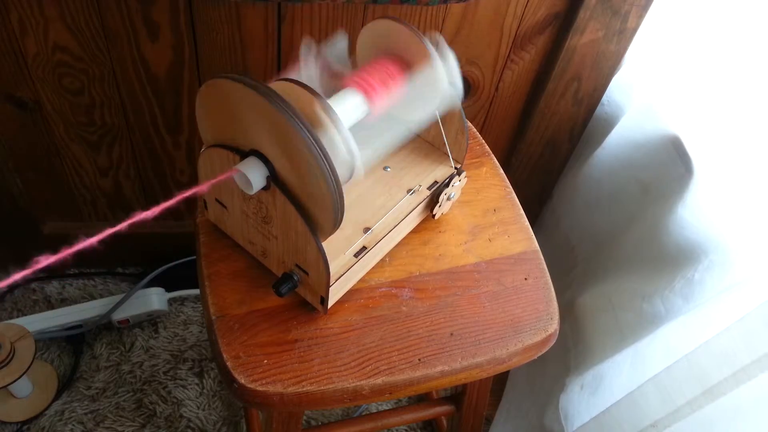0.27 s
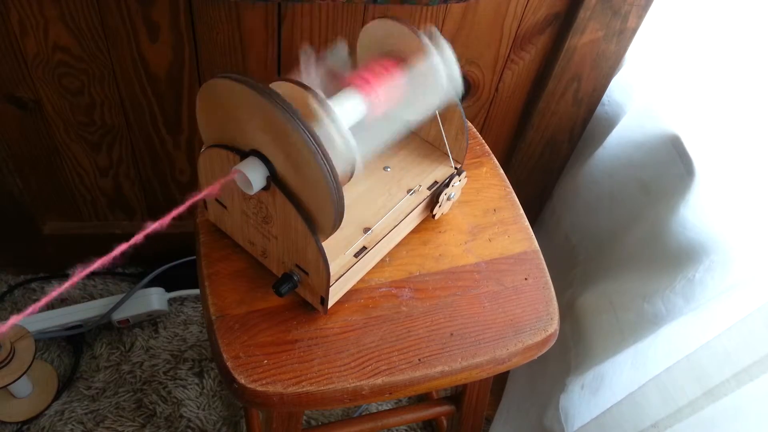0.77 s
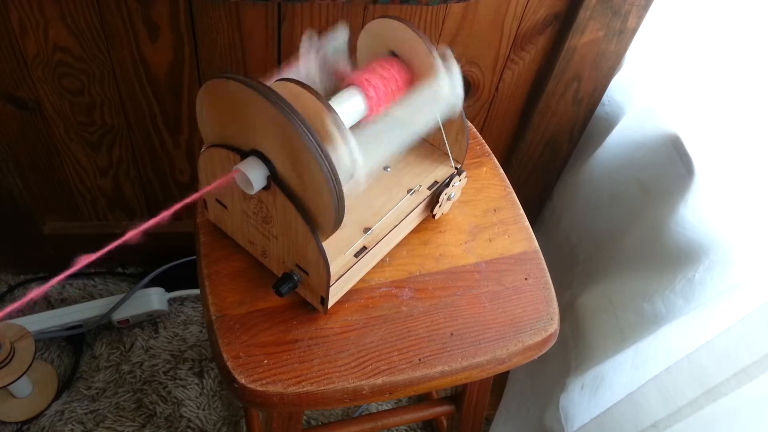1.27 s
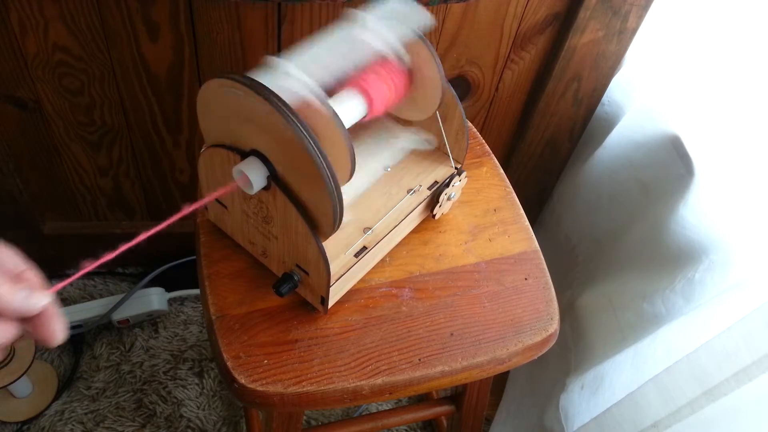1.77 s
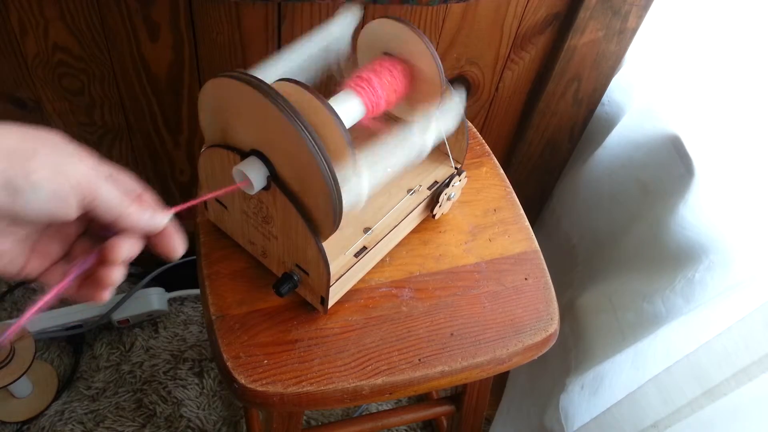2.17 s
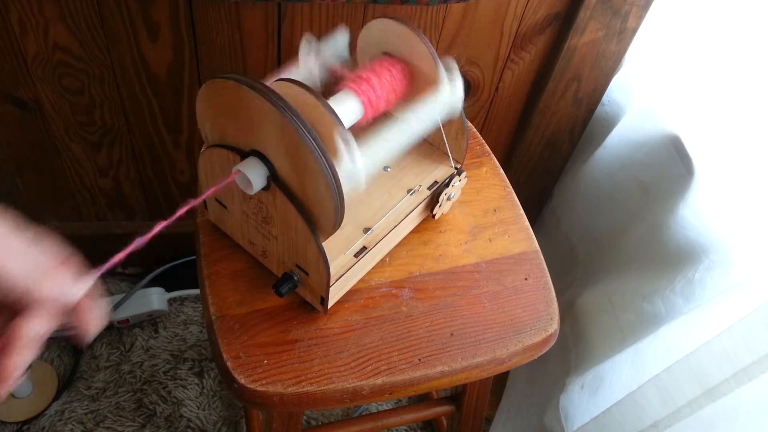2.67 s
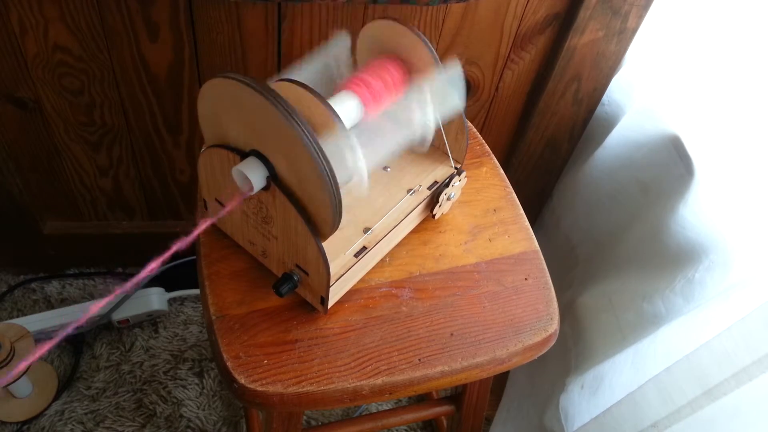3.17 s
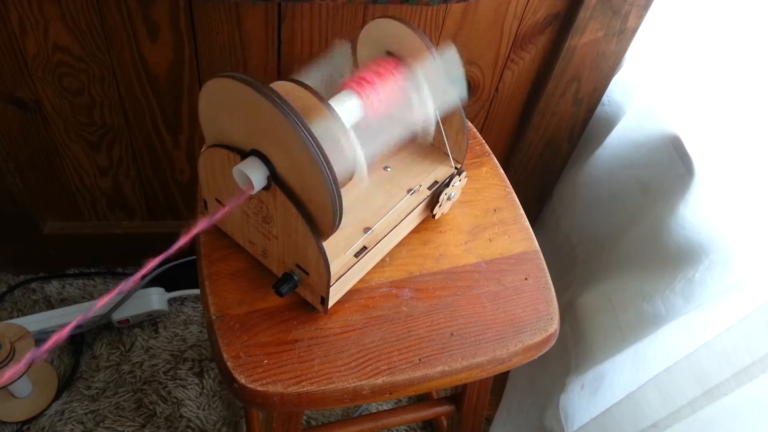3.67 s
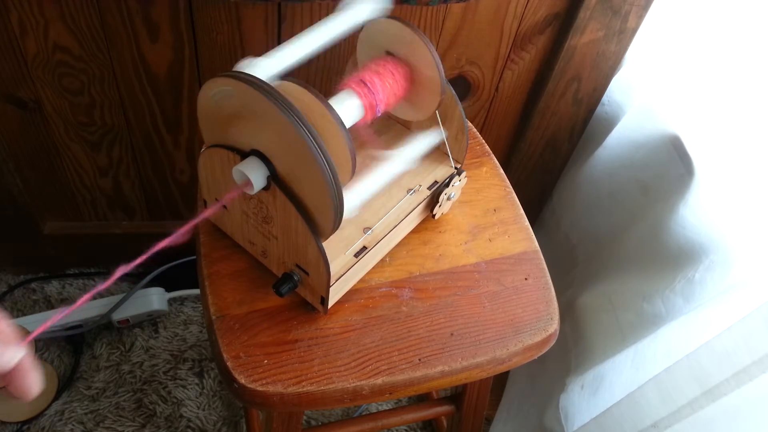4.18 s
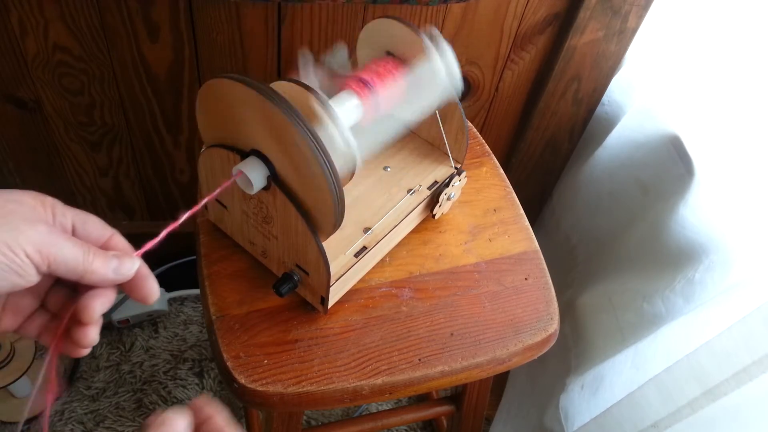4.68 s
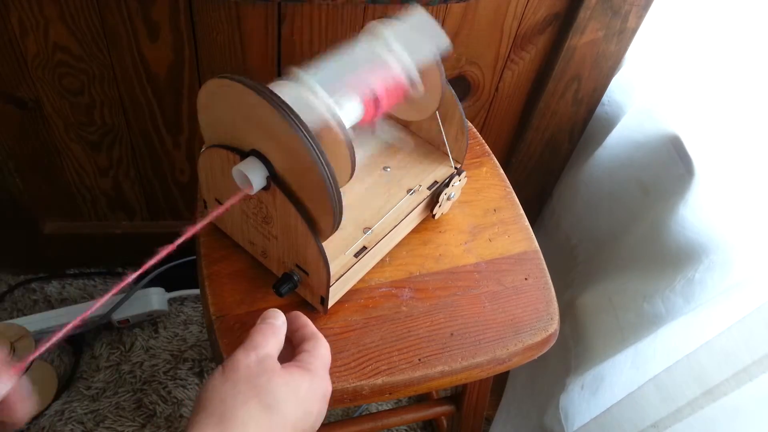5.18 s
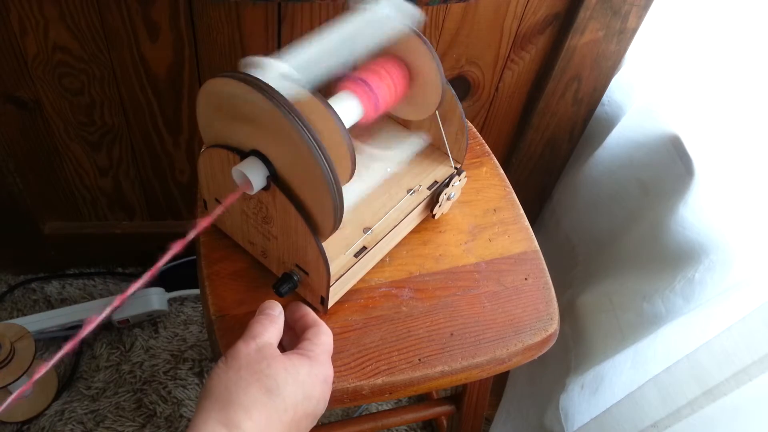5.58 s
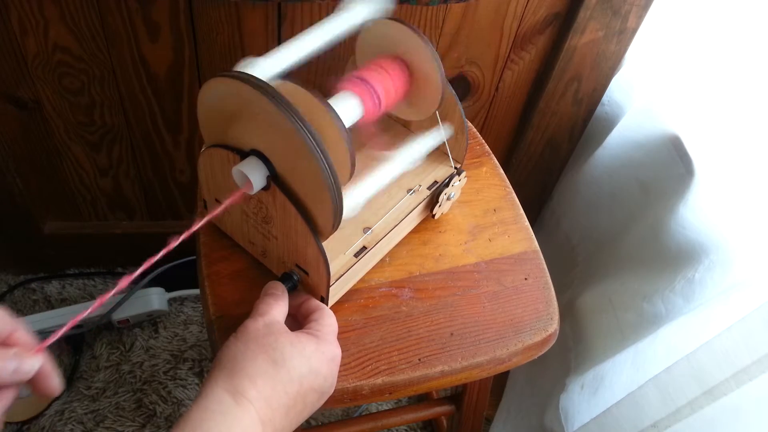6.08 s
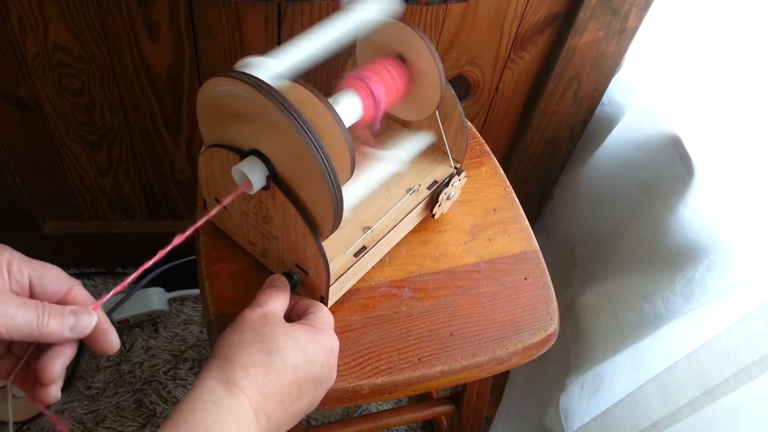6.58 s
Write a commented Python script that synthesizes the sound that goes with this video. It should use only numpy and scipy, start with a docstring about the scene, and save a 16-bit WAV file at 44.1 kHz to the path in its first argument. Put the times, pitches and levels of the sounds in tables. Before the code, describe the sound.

A small wooden electric spinning wheel whirs and rattles roughly in a quiet room, ticking and knocking irregularly, with brief squeaks, then stops abruptly.

```python
"""Quiet room, wooden stool: a small electric spinning wheel in a plywood box, a metre from a two-port
microphone. Bearings and bobbin rub in spells of light and hard contact: random stick-slip jerks through
resonances. The yarn guide ticks on many turns and the loose bobbin knocks the box: blows ring damped modes. The
drive squeaks as it slips, a gliding pulse train; the motor's fan hisses steadily. At the end the motor is
switched off and a rough hum sinks away."""
import sys
import numpy as np
from scipy import signal
from scipy.fft import rfft, irfft
from scipy.io import wavfile
from scipy.ndimage import uniform_filter1d

SR = 44100
rng = np.random.default_rng(int(sys.argv[2]) if len(sys.argv) > 2 else 0)


def voltage_ratio(level):
    """Linear amplitude factor for a level in decibels (scalar or array-like)."""
    return 10 ** (np.asarray(level, float) / 20)


def log_audio(samples):
    """Write samples as a 16-bit WAV file to the path given in sys.argv[1]."""
    # one column per channel
    frames = np.atleast_2d(samples).T
    # limit to full scale, then quantise
    limited = np.clip(frames, -1, 1)
    pcm = np.round(limited * 32767).astype(np.int16)
    wavfile.write(sys.argv[1], SR, pcm)


N = 302085
T = np.arange(N) / SR

# room air and microphone noise: pitch_hz, level_db_per_hz
ROOM_NOISE = [(28, -2), (45, -10), (69, -8), (144, -9), (183, -5), (215, -5.5), (240, -6), (1950, -20.5),
              (14300, -28), (15500, -54)]
# air from the motor's fan: pitch_hz, level_db_per_hz
FAN_AIR = [(5000, -13), (9000, -1), (12000, -2), (14400, -2), (15200, -35)]
# coasting motor: time_s, hum_hz, level_db
COASTING = [(6.68, 301.5, -58), (6.75, 148, -59), (6.82, 85, -62)]
# drive slips, one list per squeak: time_s, slip_rate_hz, level_db
DRIVE_SLIPS = [
    [(1.011, 1034, -40), (1.015, 986, -24), (1.021, 890, -22.5), (1.028, 780, -23.5), (1.036, 715, -22)],
    [(1.964, 950, -36), (1.973, 850, -27.5), (1.981, 750, -31)],
    [(5.768, 980, -31), (5.775, 853, -23.5), (5.782, 746, -27)],
    [(5.934, 738, -39), (5.951, 896, -30), (5.961, 1060, -34)],
    [(6.620, 1076, -39), (6.635, 1027, -25.5), (6.650, 884, -24.5), (6.660, 804, -26.5), (6.671, 714, -30)],
]
# resonances that colour the squeaks: pitch_hz, width_hz, level_db
SQUEAK_RESONANCES = [(780, 470, -3.5), (1170, 300, 3), (1770, 95, 6.5), (2830, 350, -10.5),
                     (3600, 580, -10), (4770, 3200, -10.5)]
# yarn guide ticks: time_s, snap_db, thud_in_box_db (against the snap)
GUIDE_TICKS = [(0.2016, -26.5, -14.5), (0.4627, -29.5, -7.5), (0.722, -25.5, -9), (0.9828, -25.5, -26),
               (1.169, -37.5, -15), (1.9262, -25, -11), (2.2343, -37, -20), (3.0733, -26, -33),
               (3.3423, -26.5, -11.5), (3.474, -38.5, -8), (3.6071, -25, -12.5), (4.4099, -42, -11),
               (4.7248, -33.5, -26), (5.1991, -25, -16), (5.464, -27.5, -16), (5.7241, -24.5, -13.5),
               (6.1806, -31.5, -9.5), (6.579, -22.5, -22)]
# plastic guide modes: pitch_hz, level_db, t60_s
GUIDE_MODES = [(3500, -25, .005), (4690, 2.5, 0.01), (5630, 5.5, 0.0022), (7184, 0.5, 0.007),
               (8360, -10, 0.01), (9460, -15.5, 0.014), (12300, -22, 0.0036)]
# treble loss of the snap: pitch_hz, gain_db
SNAP_TREBLE = [(9000, -1), (12000, -5), (14800, -9), (16500, -40)]
# bobbin knocks: time_s, end_plates_db, then against that big_panels_db, small_parts_db, bobbin_flange_db;
# rattle_s, push_s
BOBBIN_KNOCKS = [(0.234, -29, -0.5, -14, 1, 0.0043, 0.00025), (0.481, -18, 2, 0, 3.5, 0.0035, 0.00012),
                 (0.732, -21, 0.5, 0.5, 4.5, 0.0031, 0.00021), (0.984, -28, 2, 2, 9, 0.0083, 0.00023),
                 (1.229, -28.5, -4, -9, -6, 0.0036, 0.00016), (1.524, -31.5, -1.5, -7, 5.5, 0.0053, .0001),
                 (1.632, -26.5, -11, -6, -9, 0.016, 0.00012), (1.751, -38, -9, 4, -4, 0.0029, .0001),
                 (1.969, -25.5, -6, -2.5, -6, 0.0062, 0.00015),
                 (2.056, -35.5, -3, -4, -2, 0.0034, 0.000092),
                 (2.303, -24.5, -12.5, -8.5, -4, 0.0046, 0.000089),
                 (2.647, -23.5, -11, -6, 2.5, 0.0049, 0.0001), (2.694, -40.5, -18, -2, -7, 0.0045, .0001),
                 (2.783, -32, -4, 2, -14, 0.0052, 0.000097), (2.953, -48, -16, 11, 5, 0.004, .0001),
                 (3.007, -21.5, -15.5, -5, 1, 0.0054, 0.000082), (3.264, -28.5, -3, 2, 3, 0.0074, 0.00025),
                 (3.646, -24, -24, -0.5, -11, 0.0071, 0.00012), (3.745, -38, -7.5, 0, 0, 0.016, 0.000081),
                 (4.048, -27.5, -8, -5, 1, 0.0091, 0.00016), (4.337, -36.5, -21, -1, -6, 0.0069, 0.00018),
                 (4.621, -37.5, -0.5, 2, -8, 0.016, 0.00021),
                 (4.909, -31.5, -8, -0.5, -10, 0.0032, 0.00016), (5.218, -23, -4, -2, -3, 0.0086, 0.00025),
                 (5.474, -24, -5, -6, 1.5, 0.0042, 0.00014), (5.774, -26.5, -6, -0.5, -8, 0.0037, 0.00022),
                 (5.939, -28.5, -7.5, -1.5, -10, 0.015, 0.00022), (6.196, -27, -25, -1, -3, 0.003, 0.00017),
                 (6.294, -28.5, -5.5, 6.5, -8, 0.012, 0.00021), (6.614, -26.5, -5, 0, -12, 0.025, 0.00015),
                 (6.665, -27, -2, -2, -11, 0.0037, 0.00022)]
# box modes rung by every blow: pitch_hz, level_db, t60_s
BOX_MODES = [(230.6, -12.5, 0.08), (636.5, -3.5, 0.094), (674, -14, 0.012), (890, 0, 0.022),
             (1007, 0, 0.057), (1156, -0.5, 0.027), (503, -2, .2), (770, 4.5, .06), (2170, 6, .026),
             (1315, 1, 0.018), (1537, 7, 0.033), (1689, 7, 0.032), (1924, 3.5, 0.017), (2364, 3.5, 0.019),
             (2850, 7.5, 0.013), (3290, 5.5, 0.0076), (3850, 4.5, 0.012), (4970, 7.5, 0.011),
             (6900, 7, 0.0059)]
# bobbin flange range: low_hz, high_hz
FLANGE_RANGE_HZ = (1950, 2500)
# spells of hard contact: start_s, end_s, drone_db, chafe_db, hiss_db
HARD_SPELLS = [(-.3, 1.032, -38, -45, -48.5), (1.657, 1.995, -37.5, -43.5, -47),
               (2.789, 3.664, -37.5, -46, -50), (4.897, 5.777, -38.5, -45, -49.5),
               (5.909, 6.213, -37, -46.5, -43), (6.289, 6.688, -36.5, -44, -47)]
# light contact: time_s, drone_db, hiss_db
LIGHT_LEVELS = [(1.1, -45, -54.5), (1.3, -45.5, -55), (1.6, -43.5, -54), (2.1, -45.5, -50.5),
                (2.5, -45.5, -54.5), (2.75, -46.5, -53), (3.95, -48.5, -52.5), (4.1, -44, -54),
                (4.25, -45, -56), (4.36, -42.5, -51), (4.55, -44, -54.5), (4.65, -45, -51.5),
                (4.9, -44.5, -53), (5.85, -48, -52.5)]
# short bursts and dips of clatter: time_s, drone_gain_db, chafe_gain_db
CLATTER = [(.162, 1.5, 1), (.285, 1.5, 4), (.343, 5, -1), (.425, 1, 4), (.547, 7, 5), (0.614, 4.5, -4),
           (.691, 4, 6.5), (.805, 4.5, 1), (.875, 5.5, -2), (.94, 0.5, 5.5), (3.107, 3, -13), (3.164, 8, 5),
           (3.236, 5, -3), (3.305, 5, 9), (3.428, 2.5, 5), (3.496, 5.5, -1), (4.414, 3, 0), (4.519, 2, 4),
           (4.652, 5, 0), (5.056, 3, 6), (5.16, -0.5, 8.5), (5.288, 3, 9), (5.342, -2.5, 4), (5.545, 7, -4),
           (5.616, 5, -9), (5.685, -1.5, 2), (5.999, 6, 0), (6.396, 3, 1), (6.528, 2.5, 0),
           (6.588, -6.5, -5)]
# drone resonances, light and hard contact: pitch_hz, width_hz, level_db
LIGHT_DRONE = [(229, 16, -9.5), (367, 40, -12), (503.4, 18, 0.5), (655, 31, -7.5), (794, 110, -3.5),
               (980, 61, 2.5), (1190, 140, -14.5), (1495, 92, -15), (1663, 76, -1.5), (1970, 300, -10.5),
               (2920, 1150, -21), (4980, 170, -25)]
HARD_DRONE = [(251, 6.2, -19), (370, 71, -12.5), (506.4, 14, 7), (618, 76, 0), (792, 54, -0.5),
              (956, 70, -0.5), (1112, 101, 7), (1523, 170, -1.5), (1740, 152, 0), (2490, 230, -15),
              (2666, 150, -13.5)]
# bobbin chafing resonances, soft and firm: pitch_hz, width_hz, level_db
SOFT_CHAFE = [(2850, 200, -8), (3130, 250, 0), (3450, 200, 1)]
FIRM_CHAFE = [(2850, 200, -9), (3120, 200, 1), (3510, 190, 5.5), (4800, 300, -9), (7120, 1000, -18)]
# rubbing hiss: pitch_hz, level_db_per_hz
RUB_HISS = [(2650, 0.5), (4500, -3.5), (5260, -10.5), (13900, -3), (14900, -37.5), (15500, -66)]
# rubbing that only one port hears: pitch_hz, gain_db
ONE_PORT_RUB = [(300, -27), (700, -6), (1500, -1.5), (3000, 2.5), (6000, 3.5)]
# radiation; a small box makes no deep bass, wood no top: pitch_hz, gain_db
BOX_RADIATION = [(50, -21), (200, 0), (8000, -1.5), (11000, -8.5), (14000, -45)]
# room share: pitch_hz, gain_db
ROOM_SHARE = [(100, -14), (400, -11), (1000, -9), (3000, -8), (8000, -4)]
# left phase lead, negative is later: pitch_hz, lead_rad
LEFT_PHASE = [(0, 0), (4000, -1.4), (7000, 0)]
# left against right: pitch_hz, gain_db
LEFT_BALANCE = [(125, -2), (250, 0), (500, -2), (2000, -1.4), (8000, -.7)]

OFF_S = 6.68
PANELS_BELOW_HZ, PLATES_BELOW_HZ = 640, 1230
LIGHT_DB, HARD_DB = -42.5, -38.5  # drone level that means light, hard contact
SOFT_DB, FIRM_DB = -56, -36  # chafe level that means soft, firm chafing
PATCHY_DB, WAVER, WAVER_PER_S = 1.2, 0.009, 10  # each resonance swells, fades, wavers on its own
# after a spell, light contact rebounds, then settles; it is uneven
SETTLE_DB, REBOUND_S, SETTLE_S, WANDER_DB = 4.5, 0.056, 0.23, 0.93
# in a spell the drone switches, the chafe waits and catches, the hiss climbs and the drone a little with it
EDGE_S, CHAFE_WAIT_S, CHAFE_RISE_S, HISS_RISE_S = 0.014, 0.062, 0.016, 0.41
CHAFE_START_DB, DRONE_START_DB = -12, -2
# chafe swells before a firm tick and slumps after, while the drone lifts
FIRM_TICK_DB, SWELL_DB, SWELL_S, SWELL_LEAD_S = -34, 6.5, 0.073, 0.0019
SLUMP_DB, SLUMP_S, DRONE_LIFT_DB = -4.5, 0.029, 1
JOLT_DB, JOLT_S = -11.5, 0.047  # a knock on the big panels shakes the bearings
# rubbing surges as the wheel is stopped, then dies
STOP_S, STOP_DRONE_DB, STOP_HISS_DB, FADE_DB_PER_S = 0.046, 9, 12, 1100


def level(x, db=0):
    """Scale to an rms level."""
    return x * voltage_ratio(db) / np.sqrt(np.mean(x ** 2))


def colour(x, points):
    """Shape the spectrum by (Hz, dB) points, joined along log frequency."""
    hz, db = np.transpose(points)
    f = np.arange(x.shape[-1] // 2 + 1) * SR / x.shape[-1] + 1
    return irfft(rfft(x) * voltage_ratio(np.interp(np.log(f), np.log(hz), db)), x.shape[-1])


def walk(rate_hz):
    """Random levels held 1 / rate_hz and smoothed; spread near 1."""
    hold = int(SR / rate_hz)
    steps = np.repeat(rng.standard_normal(N // hold + 1), hold)
    return 2.07 * uniform_filter1d(uniform_filter1d(steps, hold), hold)[:N]


def rise(age_s, length_s):
    """0 before the start, 1 after the given length."""
    return np.clip(age_s / length_s, 0, 1)


def share(db, low_db, high_db):
    """0 at the low level, 1 at the high one."""
    return np.clip((db - low_db) / (high_db - low_db), 0, 1)


def ring(x, hz, t60_s):
    """One damped mode: a complex one-pole resonator."""
    pole = np.exp(2j * np.pi * hz / SR - np.log(1000) / (t60_s * SR))
    return signal.lfilter([1], [1, -pole], x).imag


def resonate(x, peaks, swing=-1, patchy_db=0, waver=0):
    """Resonances side by side, each with its own fades and waver; swing -1 alternates their sign."""
    out = 0
    samples = np.arange(N)
    for k, (hz, width_hz, db) in enumerate(peaks):
        band = np.atleast_2d(signal.lfilter(*signal.iirpeak(hz, hz / width_hz, SR), x))
        # an uneven clock bends the pitch
        clock = np.cumsum(1 + waver * walk(WAVER_PER_S)) % (N - 1) if waver else samples
        bent = np.array([np.interp(clock, samples, row) for row in band])
        out = out + swing ** k * voltage_ratio(db + patchy_db * walk(14)) * bent
    return out.reshape(x.shape)


def blend(x, amount, first, second, swing=-1):
    """Glide from one set of resonances to another at equal power."""
    a = level(resonate(x, first, swing, PATCHY_DB, WAVER))
    b = level(resonate(x, second, swing, PATCHY_DB, WAVER))
    return np.sqrt(1 - amount) * a + np.sqrt(amount) * b


def blows(times_s, rattle_s, crowd):
    """Sharp first contact, then a dying rattle of rebounds; one row of force per blow, equal energy."""
    age_s = np.arange(int(.06 * SR)) / SR
    chance = rng.standard_normal((len(times_s), 2, len(age_s)))
    rebounds = chance[:, 0] * (chance[:, 1] > 2)
    force = crowd * rebounds * np.exp(-age_s / np.clip(rattle_s, .001, .03)[:, None])
    force[:, 0] = 1
    return force / np.sqrt(np.sum(force ** 2, axis=1, keepdims=True))


def lay(times_s, rows, gains):
    """Place each row at its time."""
    out = np.zeros(N + rows.shape[1])
    for s, row, gain in zip(times_s, rows, gains):
        out[int(s * SR):int(s * SR) + len(row)] += gain * row
    return out[:N]


def room_tone():
    """Faint steady air and microphone noise, partly shared by both ports."""
    shared, own = rng.standard_normal(N), rng.standard_normal((2, N))
    return level(colour(0.49 * shared + own, ROOM_NOISE), -57)


def room(x):
    """Direct sound, a little later on the left, plus a short diffuse tail for each port."""
    age_s = np.arange(int(.4 * SR)) / SR
    t60_s = 0.1
    tail = rng.standard_normal((2, len(age_s))) * 1000 ** (-age_s / t60_s) * (age_s > .002)
    tail /= np.sqrt(np.sum(tail ** 2, axis=1, keepdims=True))
    wet = signal.fftconvolve(colour(x, ROOM_SHARE)[None], tail, axes=1)[:, :N]
    hz, lead_rad = np.transpose(LEFT_PHASE)
    phase_rad = np.interp(np.arange(N // 2 + 1) * SR / N, hz, lead_rad)
    late = irfft(rfft(x) * np.exp(1j * phase_rad), N)
    return np.array([late, x]) + wet


def fan():
    """Smooth air noise from the motor's fan until the motor stops."""
    running = np.clip((OFF_S - T) / .03, 0, 1)
    air = level(colour(rng.standard_normal((2, N)), FAN_AIR), -59)
    return air * running * voltage_ratio(0.72 * walk(14))


def spin_down():
    """With the current off, a rough low hum sinks in pitch and level."""
    s, hz, db = np.transpose(COASTING)
    turns = np.cumsum(np.interp(T, s, hz) * (1 + .2 * walk(90))) / SR
    hum = np.sin(2 * np.pi * turns) * walk(120)
    return hum * (T > s[0]) * (T < s[-1]) * voltage_ratio(np.interp(T, s, db))


def squeaks():
    """Nearly regular slips, slowing or speeding: a rough glide whose overtones swell across resonances."""
    out = 0
    for rows in DRIVE_SLIPS:
        s, hz, db = np.transpose(rows)
        on = (T > s[0]) & (T < s[-1])
        turns = np.cumsum(np.interp(T, s, hz) * (1 + .02 * walk(500))) / SR
        # short push at the start of each cycle, over gritty sliding
        push = np.exp(-(turns % 1) / .15) * voltage_ratio(1.5 * walk(400))
        grit = .05 * rng.standard_normal(N)
        force = (push + grit) * on * voltage_ratio(np.interp(T, s, db))
        out = out + resonate(force / .15, SQUEAK_RESONANCES)
    return out


def ticks():
    """The guide snaps: short plastic modes, and a little of it reaches the box."""
    s, snap_db, thud_db = np.transpose(GUIDE_TICKS)
    force = blows(s, np.full(len(s), .0018), crowd=.7)
    snap = lay(s, force, voltage_ratio(snap_db))
    thud = lay(s, force, voltage_ratio(snap_db + thud_db))
    out = sum(voltage_ratio(db) * ring(snap, hz, t60_s) for hz, db, t60_s in GUIDE_MODES)
    for k, (hz, db, t60_s) in enumerate(BOX_MODES):
        out = out + (-1) ** k * voltage_ratio(db) * ring(thud, hz, t60_s)
    return out


def knocks():
    """Each knock lands elsewhere, sharing its force anew among the box modes; a longer push is duller."""
    s, plates_db, panels_db, parts_db, flange_db, rattle_s, push_s = np.transpose(BOBBIN_KNOCKS)
    force = blows(s, rattle_s, crowd=.6)
    keep = np.exp(-1 / (np.clip(push_s, 1e-5, .002) * SR))
    force = np.array([signal.lfilter([1 - a], [1, -a], row) for a, row in zip(keep, force)])
    spot_db = 1.5 * rng.standard_normal((len(s), len(BOX_MODES)))
    flange_low_hz, flange_high_hz = FLANGE_RANGE_HZ
    out = 0
    for k, (hz, db, t60_s) in enumerate(BOX_MODES):
        if hz < PANELS_BELOW_HZ:
            region_db = panels_db
        elif hz < PLATES_BELOW_HZ:
            region_db = 0
        elif flange_low_hz < hz < flange_high_hz:
            region_db = flange_db
        else:
            region_db = parts_db
        gains = voltage_ratio(plates_db + region_db + db + spot_db[:, k]) * (-1) ** k
        out = out + ring(lay(s, force, gains), hz, t60_s)
    return out


def slips(rate_hz, scatter_db, flicker_db):
    """Stick-slip: tiny random jerks of uneven size and flickering strength; three rows rub at once."""
    sizes = voltage_ratio(scatter_db * np.minimum(rng.exponential(size=(3, N)), 3))
    jerks = (rng.random((3, N)) < rate_hz / SR) * rng.standard_normal((3, N)) * sizes
    return jerks * voltage_ratio(flicker_db * walk(35))


def gripping():
    """While the drive slips, steady rubbing eases off."""
    slipping = sum(1. * ((T > rows[0][0]) & (T < rows[-1][0])) for rows in DRIVE_SLIPS)
    return voltage_ratio(-7 * uniform_filter1d(slipping, size=200))


def bursts():
    """Gains in dB for drone and chafe: each burst or dip sets in fast and dies away."""
    gains_db = 0
    for s, *row_db in CLATTER:
        shape = rise(T - s, 0.0034) * np.exp(-np.maximum(T - s, 0) / 0.025)
        gains_db = gains_db + np.outer(row_db, shape)
    return gains_db


def contact():
    """Levels in dB of drone, chafe and hiss, from the spells, ticks, knocks and the stop."""
    settle = 0
    for _, end_s, *_ in HARD_SPELLS:
        decay = np.exp(-np.maximum(T - end_s, 0) / SETTLE_S)
        settle = settle + SETTLE_DB * decay * rise(T - end_s, REBOUND_S)
    s, light_drone_db, light_hiss_db = np.transpose(LIGHT_LEVELS)
    drone = np.interp(T, s, light_drone_db) + settle + WANDER_DB * walk(12)
    chafe = np.full(N, SOFT_DB)
    hiss = np.interp(T, s, light_hiss_db) + settle
    for start_s, end_s, drone_db, chafe_db, hiss_db in HARD_SPELLS:
        on = rise(T - start_s, EDGE_S) * rise(end_s - T, EDGE_S)
        climb = rise(T - start_s, HISS_RISE_S)
        catch = rise(T - start_s - CHAFE_WAIT_S, CHAFE_RISE_S)
        drone = drone + on * (drone_db + DRONE_START_DB * (1 - climb) - drone)
        chafe = chafe + on * (chafe_db + CHAFE_START_DB * (1 - catch) - chafe)
        hiss = hiss + on * climb * (hiss_db - hiss)
    for s, snap_db, _ in GUIDE_TICKS:
        if snap_db > FIRM_TICK_DB:
            before_s = s - SWELL_LEAD_S - T
            swell = np.where(before_s > 0, np.exp(-np.abs(before_s) / SWELL_S), rise(s - T, SWELL_LEAD_S))
            slump = np.exp(-((T - s - SLUMP_S) / SLUMP_S) ** 2)
            chafe = chafe + SWELL_DB * swell + SLUMP_DB * slump
            drone = drone + DRONE_LIFT_DB * slump
    jolt_power = 0
    for s, plates_db, panels_db, *_ in BOBBIN_KNOCKS:
        decay = np.exp(-2 * np.maximum(T - s, 0) / JOLT_S) * (T > s)
        jolt_power = jolt_power + voltage_ratio(2 * (plates_db + panels_db + JOLT_DB)) * decay
    drone = 10 * np.log10(voltage_ratio(2 * drone) + jolt_power)
    surge = rise(T - OFF_S + STOP_S + EDGE_S, STOP_S)
    fade = FADE_DB_PER_S * np.maximum(T - OFF_S + EDGE_S, 0)
    return drone + STOP_DRONE_DB * surge - fade, chafe - fade, hiss + STOP_HISS_DB * surge - fade


def rubbing():
    """Harder contact stiffens the parts: drone and chafe glide to other, mostly higher, resonances."""
    drone_db, chafe_db, hiss_db = contact()
    hard = share(drone_db, LIGHT_DB, HARD_DB)
    firm = share(chafe_db, SOFT_DB, FIRM_DB)
    drone_gain, chafe_gain = voltage_ratio(bursts())
    drone = blend(slips(rate_hz=1100, scatter_db=3.5, flicker_db=.9), hard, LIGHT_DRONE, HARD_DRONE)
    chafe = blend(slips(rate_hz=1600, scatter_db=3.3, flicker_db=.8), firm, SOFT_CHAFE, FIRM_CHAFE, swing=1)
    hiss = level(colour(slips(rate_hz=9000, scatter_db=4.5, flicker_db=.8), RUB_HISS))
    out = voltage_ratio(drone_db) * drone_gain * drone
    # the chafe dies away under light contact
    out = out + voltage_ratio(chafe_db) * chafe_gain * np.sqrt(hard) * chafe
    return out + voltage_ratio(hiss_db) * hiss


def scene():
    """The wheel in its room; rubbing comes from a wide object, so the ports share only part of it."""
    rub = colour(rubbing() * gripping(), BOX_RADIATION)
    hits = colour(knocks() + squeaks(), BOX_RADIATION)
    hits = hits + colour(ticks(), SNAP_TREBLE) + spin_down()
    # row 0 reaches both ports, rows 1 and 2 one port each
    left, right = room(rub[0] + hits) + colour(rub[1:], ONE_PORT_RUB) + fan()
    return np.array([colour(left, LEFT_BALANCE), right]) + room_tone()


def low_pass(x):
    """Removes everything above the highest recorded frequency."""
    return signal.sosfilt(signal.butter(12, 15660, fs=SR, output="sos"), x)


def record(dry):
    """The microphone drops the deepest bass."""
    low_cut = signal.butter(2, 73.4, "high", fs=SR, output="sos")  # Hz
    mix = signal.sosfilt(low_cut, dry)
    return low_pass(mix)


dry = scene()
out = record(dry)
log_audio(out)
```